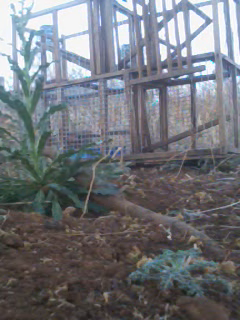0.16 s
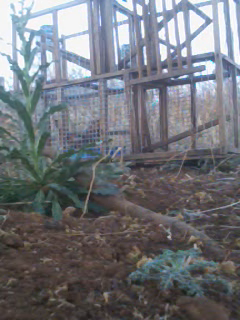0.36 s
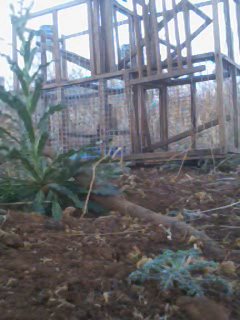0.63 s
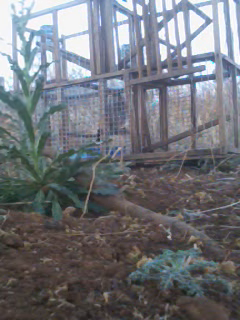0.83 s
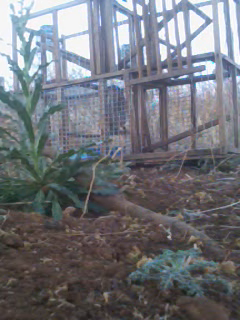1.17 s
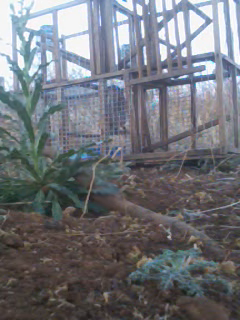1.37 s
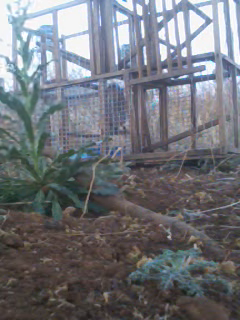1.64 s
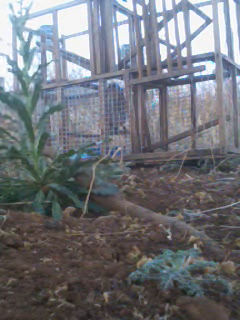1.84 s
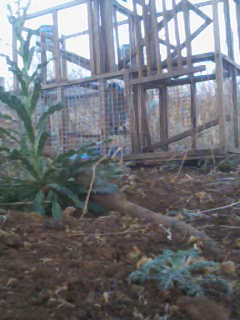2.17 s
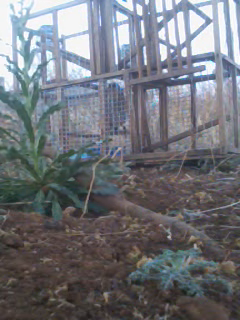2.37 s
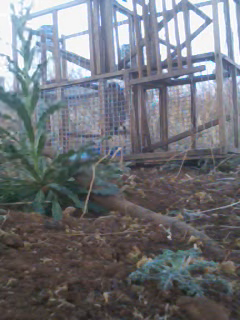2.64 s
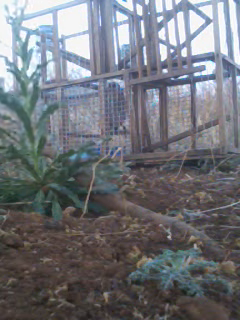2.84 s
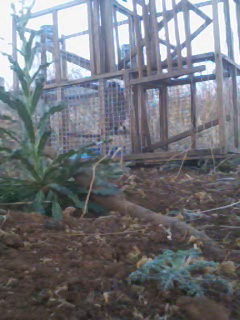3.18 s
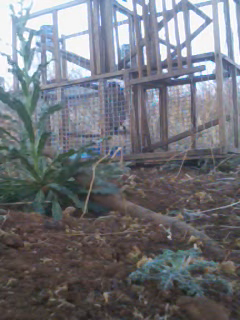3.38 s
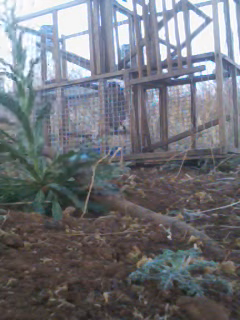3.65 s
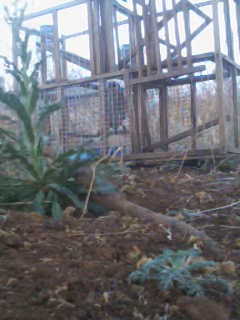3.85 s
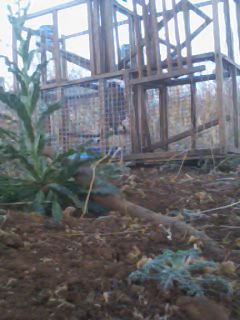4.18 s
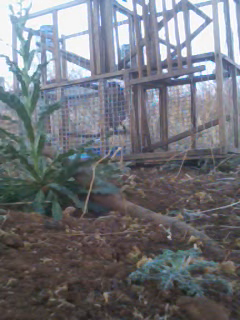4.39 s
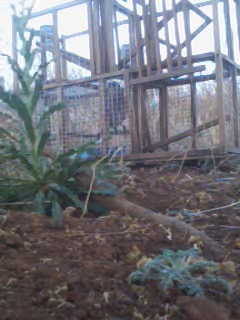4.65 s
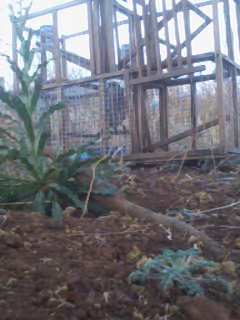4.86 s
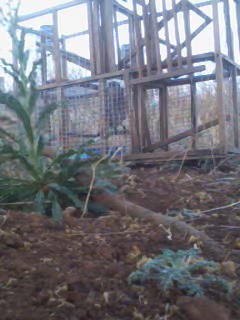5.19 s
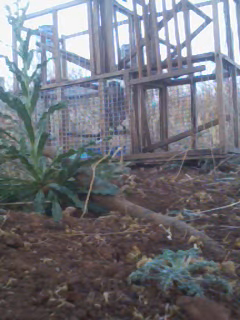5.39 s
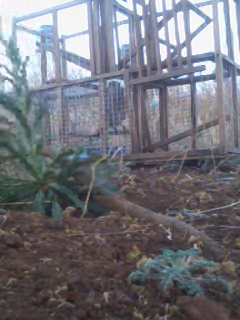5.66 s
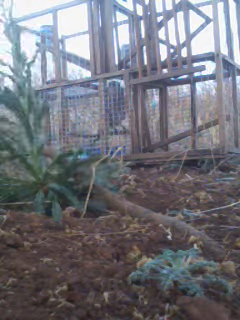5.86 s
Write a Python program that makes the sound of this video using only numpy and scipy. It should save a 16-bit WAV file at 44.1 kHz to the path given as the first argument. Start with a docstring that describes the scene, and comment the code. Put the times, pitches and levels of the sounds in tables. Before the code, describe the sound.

Faint scuffs in dry litter and light taps by a wooden coop open the scene in a rural yard. A songbird gives two buzzy rasps, then three high squeals that start with a trill and glide down hoarsely. It ends with a long, lower sliding whistle and a shorter one. A few more taps fall among the calls, while soft gusts buffet the microphone and dry plants rustle faintly.

```python
"""Faint scuffs in dry litter and taps by a wooden coop, then a mockingbird sings across the yard.
Two rasps (a buzzing membrane chopped by flutter) lead to three squeals (both sides of the syrinx
at once, trilling, gliding down, breaking hoarse) and two sliding whistles. A far bird slurs one note.
Gusts buffet the microphone and dry plants rustle; the ground and the coop return short echoes."""
import sys
import numpy as np
from scipy import signal
from scipy.fft import rfft, irfft
from scipy.io import wavfile

SR = 44100
rng = np.random.default_rng(int(sys.argv[2]) if len(sys.argv) > 2 else 0)


def store_pcm(level_fs):
    """Save levels as 16-bit WAV."""
    pcm = np.round(np.clip(level_fs, -1, 1) * 32767).astype(np.int16)
    wavfile.write(sys.argv[1], SR, np.atleast_2d(pcm).T)


N = 266364
TIME_S = np.arange(N) / SR

# rasps: (start [s], length [s], pitch [Hz], scoop [s], sag [Hz/s], nominal level [dB], swell [s])
RASPS = [(0.903, 0.3426, 748.6, .031, 205, -49.5, 0.069), (1.674, 0.3654, 735.5, .019, 90.1, -47, 0.031)]
# throat colour at a 715 Hz pitch, sliding with the pitch: (frequency [Hz], relative level [dB])
THROAT = [(1100, -43), (1450, -33.5), (2150, -1.5), (2850, 3.5), (3550, -4.5), (4250, -0.5), (5000, -3.5),
          (5750, -3.5), (6400, -3), (7100, -24.5), (7900, -42), (9500, -57.5)]

def rasp(start_s, length_s, pitch_hz, scoop_s, sag_hz_per_s, top_db, swell_s,
         flutter_hz=(143, 113), throat_pitch_hz=715, full_force_db=-51, hiss_db=-16):
    """A buzzing membrane, chopped into bursts by a slowing flutter."""
    t = np.arange(round(length_s * SR)) / SR
    scoop = .25 * np.exp(-t / scoop_s)
    droop = .077 * np.exp((t - length_s) / .012)
    hz = (pitch_hz - sag_hz_per_s * t) * (1 - scoop - droop)
    db = top_db - 16.5 * np.exp(-t / swell_s)
    flutter = phase(np.linspace(*flutter_hz, len(t)) * (1 + .006 * wander(68, len(t))))
    opening = .5 - .5 * np.cos(flutter)
    arch = .027 * (opening - .8)  # pressure lifts the pitch mid-burst
    turn = phase(hz * (1 + arch + .009 * wander(240, len(t)) + .007 * wander(30, len(t))))
    tilt_db = .46 * np.minimum(db - full_force_db, 0)  # duller while gathering force
    buzz = 0
    for k in range(2, 13):
        partial_db = read(THROAT, k * throat_pitch_hz) + tilt_db * 2 * np.sqrt(max(k - 3, 0))
        gain = amp(partial_db + .6 * wander(90, len(t)))
        throat_lag = np.pi * k * k / 10
        smear = .125 * (k - 2) * wander(320, len(t))
        buzz += gain * np.cos(k * turn + throat_lag + smear)
    voice = unit(buzz) + amp(hiss_db + tilt_db) * noise(THROAT, len(t))
    bursts = unit(voice * (.03 + opening ** 1.25))
    return start_s, amp(db - tilt_db) * gate(t, attack_s=.0064, release_s=.027) * bursts


# squeals: (start [s], length [s], attack [s], upper voice [dB], lower voice [dB],
# lower voice change in trill [dB], tiring at end [dB], nominal hoarseness at end [dB])
SQUEALS = [(2.272, 0.6006, .05, -47.5, -51.5, -6.5, 4, -63), (3.031, 0.51, 0.04, -43, -47.5, -4.5, -8, -57),
           (3.754, 0.508, 0.037, -42.5, -46.5, -3.5, -14.5, -61.5)]
# opening trill per squeal: (rate [Hz], depth [share of pitch], length [s])
TRILLS = [(97, .06, .115), (88, .03, .095), (94, .045, .125)]
# pitch glide per squeal: (time [s], upper voice [Hz], lower voice [Hz])
GLIDES = [
    [(2.325, 6410, 4525), (2.369, 6240, 4561), (2.393, 5894, 4505), (2.407, 5780, 4382),
     (2.493, 5324, 4125), (2.707, 5172, 4007), (2.797, 5098, 3824), (2.84, 4993, 3814)],
    [(3.09, 6340, 4194), (3.094, 6386, 4275), (3.18, 5573, 4102), (3.262, 5334, 3924), (3.402, 5147, 3805),
     (3.478, 5090, 3930), (3.5, 4920, 3730)],
    [(3.815, 6100, 3927), (3.827, 5963, 4098), (3.961, 5385, 3993), (4.001, 5255, 3806),
     (4.087, 5134, 3704), (4.173, 5063, 3751), (4.181, 4940, 3927), (4.235, 4760, 3830)],
]

def squeal(row, glide, trill, trill_fade_s=.044, flick_s=.026, shimmer=.18):
    """Both sides of the syrinx sound at once, trilling together, then gliding down."""
    start_s, length_s, attack_s = row[:3]
    rate_hz, depth, trill_s = trill
    t = start_s + np.arange(round(length_s * SR)) / SR
    trilling = np.clip((trill_s - (t - start_s)) / trill_fade_s + .5, 0, 1)
    flick = np.clip(1 - (t[-1] - t) / flick_s, 0, 1)
    upper_gain, lower_gain, hoarse_gain = squeal_levels(t, row, trilling, flick)
    upper_on = gate(t, attack_s, release_s=.031)
    beat = phase(rate_hz * (1 + .078 * wander(37, len(t))))
    bend = 1 + depth * trilling * (np.sin(beat) + .47 * np.cos(2 * beat))
    jitter = .0025 + .011 * trilling
    upper, lower = (phase(hz * bend * (1 + jitter * wander(340, len(t))))
                    for hz in squeal_pitches(t, glide, attack_s, flick))
    blur = np.minimum(1.36 * hoarse_gain / lower_gain, 2)
    voices = upper_gain * upper_on * np.sin(upper), lower_gain * lower_voice(t, upper, lower, blur)
    tones = sum(voice * (1 + shimmer * wander(100, len(t))) for voice in voices)
    hoarse = hoarse_gain * upper_on * hoarseness(len(t), blur, trilling)
    return start_s, (np.sqrt(2) * tones + hoarse) * gate(t, .46 * attack_s, release_s=.027)


def squeal_pitches(t, glide, attack_s, flick, scoop=.53):
    """Both voices scoop into the glide; at the end the lower flicks up to the upper."""
    s, upper_hz, lower_hz = np.transpose(glide)
    upper_hz = np.interp(t, s, upper_hz) * (1 - scoop * np.exp((t[0] - t) / (.45 * attack_s)))
    lower_hz = np.interp(t, s, lower_hz) * (1 - scoop * np.exp((t[0] - t) / (.38 * attack_s)))
    return upper_hz, lower_hz + (upper_hz - lower_hz) * flick


# voice breaks: (centre [s], length [s], upper voice dip [dB], nominal hoarseness [dB])
BREAKS = [(2.495, 0.047, -9, -58.5), (2.658, .06, -8.5, -65), (2.722, 0.018, -10, -60),
          (2.824, 0.038, -6.5, -71), (2.857, 0.016, -1.5, -52.5), (3.231, 0.043, -4, -67.5),
          (3.355, 0.042, -9, -58.5), (3.457, 0.045, -8, -56.5), (3.5, 0.023, -8, -59),
          (4.046, 0.04, -12, -66), (4.147, 0.059, -5.5, -53.5), (4.205, .03, -4.5, -72)]

def squeal_levels(t, row, trilling, flick, trill_upper_db=-1, flick_db=-8.5):
    """Gains of both voices and of the hoarseness, strong in the trill and the breaks."""
    upper_db, lower_db, trill_lower_db, tiring_db, late_hoarse_db = row[3:]
    progress = np.linspace(0, 1, len(t))
    tired_db = tiring_db * progress ** 5.1
    dips_db = sum(db * bump(t, s, length_s) for s, length_s, db, _ in BREAKS)
    upper = amp(upper_db + tired_db + dips_db + trill_upper_db * trilling)
    lower = amp(lower_db + tired_db + trill_lower_db * trilling + flick_db * flick)
    hoarse = amp(np.linspace(-69, late_hoarse_db, len(t))) + amp(-59) * trilling
    breaks = sum(amp(db) * bump(t, s, length_s) for s, length_s, _, db in BREAKS)
    return upper, lower, np.hypot(hoarse, breaks)


# side tones: (upper voice multiple [1], lower voice multiple [1])
SIDE_TONES = [(-1, 2), (2, -2), (2, -1), (-1, 3)]
# per side tone: (level re lower voice [dB])
SIDE_TONES_DB = [-20.5, -26.5, -24.5, -20.5]

def lower_voice(t, upper, lower, blur, octave_db=-18, doubling_db=-9.5):
    """The lower tone, its octave, and side tones made as the voices modulate each other."""
    sides = sum(amp(db) * np.sin(m * upper + n * lower + blur * wander(500, len(t)))
                for (m, n), db in zip(SIDE_TONES, SIDE_TONES_DB))
    octave = amp(octave_db) * np.sin(2 * lower + blur * wander(390, len(t)))
    # period doubling, first squeal only
    doubling = amp(doubling_db) * bump(t, centre_s=2.575, length_s=.28)
    halves = .4 * np.sin(lower / 2) + np.sin(1.5 * lower) + .47 * np.sin(upper - lower / 2)
    return np.sin(lower) + sides + octave + doubling * halves


# hoarse hiss spectrum: (frequency [Hz], relative density [dB])
HOARSE = [(900, -46), (1800, -15), (2700, 0.5), (3400, 7), (4000, -6), (4550, -12), (5600, 6), (7000, -2.5),
          (8000, -25), (9500, -37)]

def hoarseness(size, blur, trilling, fray_hz=3400, fray_db=-1.5, hiss_db=-2):
    """Hiss, plus a chaotic band just beneath the lower voice as it frays."""
    fray_gain = amp(fray_db) * np.minimum(blur, 1) * (1 - trilling)
    fray = fray_gain * np.sin(phase(fray_hz * (1 + .18 * wander(500, size))))
    hiss = amp(hiss_db) * noise(HOARSE, size)
    return (fray + hiss) * (1 + .32 * wander(120, size))


# contour per whistle: (time [s], pitch [Hz], fundamental [dB], octave [dB])
WHISTLES = [
    [(4.522, 1203, -64, -62.5), (4.532, 1220, -61.5, -66.5), (4.572, 1262, -56, -64.5),
     (4.724, 1227, -57, -56), (5.02, 1185, -55.5, -58.5), (5.242, 1128, -59.5, -56),
     (5.338, 1057, -64.5, -56), (5.356, 1002, -64.5, -57.5), (5.438, 990, -66.5, -51),
     (5.508, 948, -61.5, -55.5), (5.522, 873, -71, -56.5)],
    [(5.858, 1140, -59, -70), (5.874, 1145, -60.5, -66.5), (5.902, 1203, -55.5, -69),
     (5.94, 1170, -57.5, -59), (5.98, 1107, -55.5, -52.5), (6.036, 1066, -63.5, -43)],
]

def whistle(rows, jitter=.005, shimmer=.019, brightening_db_per_hz=.0376):
    """One clean, wavering voice; its octave takes over and overtones rise as the pitch sinks."""
    t, hz, fundamental_db, octave_db = curves(rows)
    turn = phase(hz * (1 + jitter * wander(45, len(t))))
    overtone_db = octave_db + brightening_db_per_hz * (hz.max() - hz)
    levels_db = fundamental_db, octave_db, overtone_db - 35, overtone_db - 39
    partials = sum(amp(db) * np.sin(k * turn) for k, db in enumerate(levels_db, 1))
    envelope = (1 + shimmer * wander(40, len(t))) * gate(t, attack_s=.0028, release_s=.0023)
    return t[0], np.sqrt(2) * partials * envelope


def voice_crack(start_s=5.517):
    """The voice cracks with a click as the long whistle stops."""
    return start_s, tap(db=-55, hz=1900)


# taps on wood: (start [s], level before trim [dB], ring [Hz])
TAPS = [(0.164, -58, 1300), (0.261, -79, 1580), (0.344, -75, 409), (0.618, -62.5, 910), (0.981, -53, 440),
        (2.381, -49.5, 916), (2.705, -53.5, 423), (2.802, -51.5, 522), (3.381, -49.5, 400),
        (3.401, -48, 850), (3.424, -49.5, 424)]

def tap(db, hz, t60_s=.033, band_ratio=1.59, trim_db=-8):
    """A short, well damped click around one frequency."""
    t = np.arange(SR // 10) / SR
    spectrum = [(hz / 4, -25), (hz / band_ratio, -6), (hz, 0), (hz * band_ratio, -9), (hz * 7, -35)]
    return amp(db + trim_db - 60 * t / t60_s) * noise(spectrum, len(t))


# scuffs: (start [s], level [dB], half the length of the scuff [s], centre [Hz])
SCUFFS = [(0.05, -82.5, 0.075, 5500), (0.076, -76.5, 0.081, 2200), (0.157, -76, 0.061, 2300),
          (0.166, -82, 0.027, 5800), (0.241, -82.5, .04, 5900), (0.259, -70, 0.015, 2800),
          (4.863, -76.5, 0.013, 5670), (5.139, -81, 0.056, 5870), (5.192, -79.5, 0.091, 4190)]

def scuff(db, half_length_s, hz):
    """Dry litter scuffed: a grainy burst that swells quickly and dies away."""
    size = int(2 * half_length_s * SR) + 8
    age = np.linspace(0, 8, size)
    spectrum = [(hz / 6, -25), (hz / 2, -5), (hz, 0), (hz * 1.32, -9), (hz * 4, -28)]
    grains = noise(spectrum, size) * amp(7 * wander(370, size))
    return amp(db) * unit(grains) * age * np.exp(1 - age)


# far bird's note: (time [s], pitch [Hz], level [dB])
FAR_NOTE = [(1.355, 5040, -96), (1.367, 4650, -81), (1.38, 4000, -82.5), (1.403, 3490, -79),
            (1.43, 3100, -91)]

def far_bird():
    """A faint, broken downward slur, blurred by distance."""
    t, hz, db = curves(FAR_NOTE)
    gain = amp(db + 3.5 * wander(80, len(t)))
    return t[0], gain * np.sin(phase(hz * (1 + .049 * wander(1100, len(t)))))


# gusts: (centre [s], length [s], level [dB])
GUSTS = [(0.409, 0.066, -62.5), (0.824, 0.063, -54), (0.909, 0.061, -60), (1.044, 0.045, -53.5),
         (1.122, 0.06, -57.5), (1.42, 0.2, -60), (1.873, 0.17, -55), (2.149, 0.15, -62.5),
         (2.42, 0.34, -65.5), (2.626, 0.1, -63), (2.908, 0.1, -51.5), (3.085, 0.2, -58),
         (3.554, 0.072, -51.5), (3.669, 0.1, -53.5), (3.882, 0.14, -51.5), (4.032, 0.17, -57),
         (4.2, 0.39, -60.5), (4.982, .12, -64.5), (5.448, 0.22, -54.5), (6.006, 0.046, -51)]
# buffeting spectrum: (frequency [Hz], relative density [dB])
BUFFET = [(15, -32), (25, 2), (102, -2), (407, -24.5), (438, -28), (472, -27.5), (533, -31), (900, -47.5),
          (1170, -56.5), (1980, -120)]

def wind(lull_db=-69, lumps_db=1.16):
    """Gusts buffet the microphone, with light, lumpy wind between."""
    gusts = sum(amp(db) * bump(TIME_S, s, length_s) for s, length_s, db in GUSTS)
    lull = amp(lull_db + lumps_db * wander(2.7, N))
    return np.hypot(gusts, lull) * noise(BUFFET, N)


# rustle in the rising breeze: (time [s], level before trim [dB])
BREEZE = [(0.0, -84), (0.1, -86), (2.89, -78.5), (3.6, -74.5), (4.74, -76), (6.04, -72.5)]
# rustle spectrum: (frequency [Hz], relative density [dB])
RUSTLE = [(100, -6), (400, 2.5), (800, 0.5), (1300, -4), (2000, -10), (4000, -20), (7000, -25.5),
          (9500, -56)]

def plants(trim_db=2.5, patchy_db=1.84):
    """Dry plants rustle as the breeze picks up."""
    db = np.interp(TIME_S, *np.transpose(BREEZE)) + trim_db
    return amp(db + patchy_db * wander(35, N)) * noise(RUSTLE, N)


# still air spectrum: (frequency [Hz], relative density [dB])
AIR = [(100, -5.5), (300, 5.5), (800, -11), (1500, -8.5), (2500, -12.5), (5000, -10), (6500, -14.5),
       (7500, -30.5), (9000, -41.5)]

def air(db=-82.5):
    """A steady wash of air."""
    return amp(db) * noise(AIR, N)


# echoes off ground and coop: (delay [s], level [dB])
ECHOES = [(.0063, -38), (.0072, -25), (0.0121, -9)]

def yard(x, slats_db=-18, slats_t60_s=.032, tail_db=-28, tail_t60_s=.41, echoes_per_s=2000):
    """Distinct echoes, quick scatter from the slats and a faint open-air tail."""
    t = np.arange(SR // 2) / SR
    response = sum(amp(db) * np.sinc((t - s) * SR) for s, db in ECHOES)
    for db, t60_s in ((slats_db, slats_t60_s), (tail_db, tail_t60_s)):
        signs = rng.choice([-1, 1], len(t))
        arrivals = (rng.random(len(t)) < echoes_per_s / SR) * (t > .002)
        scatter = signs * arrivals * amp(-60 * t / t60_s)
        response += amp(db) * scatter / np.linalg.norm(scatter)
    return x + signal.fftconvolve(x, response)[:N]


def amp(db):
    """Decibels to gain."""
    return 10 ** (np.asarray(db) / 20)


def unit(x):
    """Scales to rms 1."""
    return x / np.sqrt(np.mean(x ** 2) + 1e-20)


def read(spectrum, hz):
    """A spectrum's dB at any frequency."""
    points_hz, db = np.transpose(spectrum)
    return np.interp(np.log(hz + 1), np.log(points_hz + 1), db)


def curves(rows):
    """The sample times a table spans, then each column at those times."""
    s, *columns = np.transpose(rows)
    t = np.arange(round(s[0] * SR), round(s[-1] * SR)) / SR
    return [t] + [np.interp(t, s, column) for column in columns]


def add(mix, start_s, sound):
    """Mixes a sound in."""
    part = mix[max(round(start_s * SR), 0):][:len(sound)]
    part += sound[:len(part)]


def noise(spectrum, size):
    """Shaped noise of rms 1."""
    gain = amp(read(spectrum, np.fft.rfftfreq(size, 1 / SR)))
    return unit(irfft(rfft(rng.standard_normal(size)) * gain, size))


def wander(hz, size):
    """Random motion of rms 1, mostly slower than hz."""
    rolloff = 1 + (np.fft.rfftfreq(size, 1 / SR) / hz) ** 2
    return unit(irfft(rfft(rng.standard_normal(size)) / rolloff, size))


def phase(hz):
    """Running phase of a frequency curve."""
    return 2 * np.pi * np.cumsum(hz) / SR


def gate(t, attack_s, release_s):
    """Fades in, holds, fades out."""
    ramp = np.minimum((t - t[0]) / attack_s, (t[-1] - t) / release_s)
    return np.sin(np.pi / 2 * np.clip(ramp, 0, 1)) ** 2


def bump(t, centre_s, length_s):
    """A flat-topped swell of height 1, length_s wide at half height."""
    return .5 ** (abs(2 * (t - centre_s) / length_s) ** 3)


def lowpass(x, hz):
    """A steep low-pass."""
    return signal.oaconvolve(x, signal.firwin(511, hz, window=("kaiser", 9), fs=SR)[None], "same")


def scene():
    """Song, taps and scuffs echo in the yard, over wind, plants and air."""
    mix = np.zeros(N)
    for row in RASPS:
        add(mix, *rasp(*row))
    for row, glide, trill in zip(SQUEALS, GLIDES, TRILLS):
        add(mix, *squeal(row, glide, trill))
    for rows in WHISTLES:
        add(mix, *whistle(rows))
    add(mix, *voice_crack())
    add(mix, *far_bird())
    for start_s, db, hz in TAPS:
        add(mix, start_s, tap(db, hz))
    for start_s, db, half_length_s, hz in SCUFFS:
        add(mix, start_s, scuff(db, half_length_s, hz))
    return (yard(mix) + wind() + plants() + air())[None]


def record(dry, converter_hz=16000, mirror_from_hz=7100, mirror_db=-7, edge_hz=8950):
    """A narrow-band converter mirrors a little top treble upward; a band limit follows."""
    fold_hz = converter_hz / 2
    band = lowpass(dry, fold_hz)
    hz = np.fft.rfftfreq(N, 1 / SR)
    fade = np.clip((hz - mirror_from_hz) / (fold_hz - mirror_from_hz), 0, 1)
    treble = irfft(rfft(band) * fade, N)
    mirrored = amp(mirror_db) * treble * 2 * np.cos(2 * np.pi * converter_hz * TIME_S)
    return lowpass(band + mirrored, edge_hz)


dry = scene()
out = record(dry)
store_pcm(out)
```